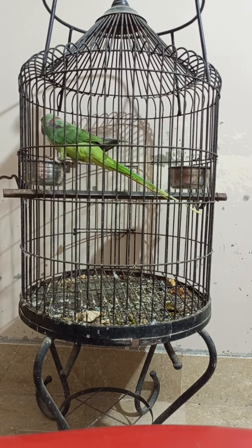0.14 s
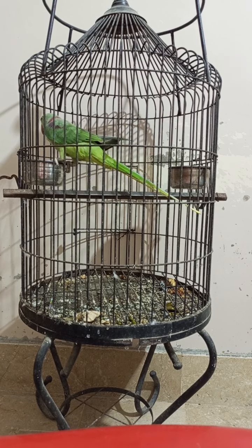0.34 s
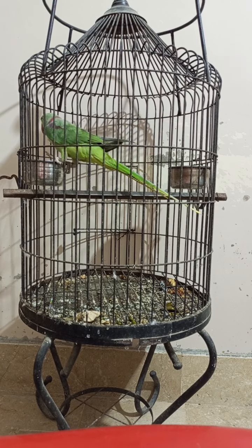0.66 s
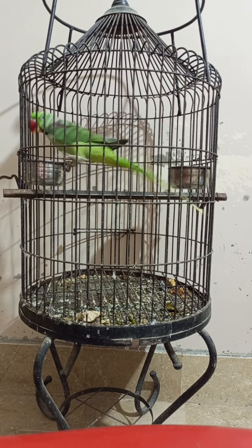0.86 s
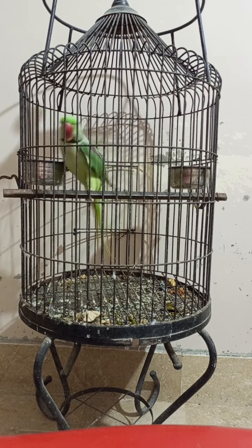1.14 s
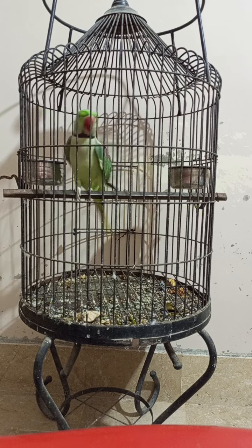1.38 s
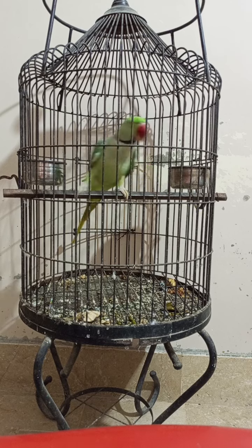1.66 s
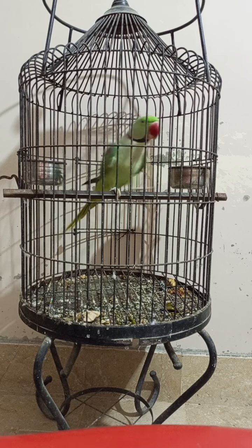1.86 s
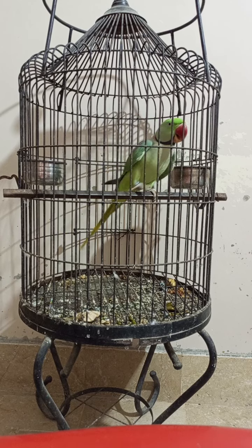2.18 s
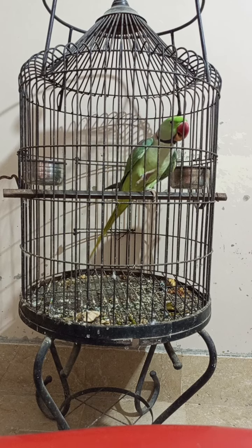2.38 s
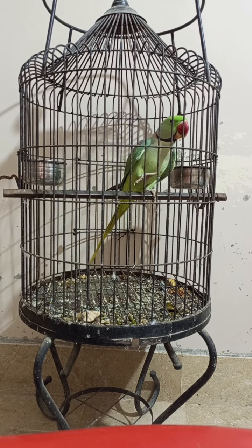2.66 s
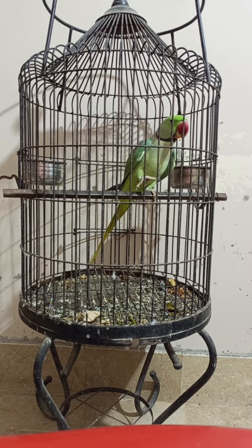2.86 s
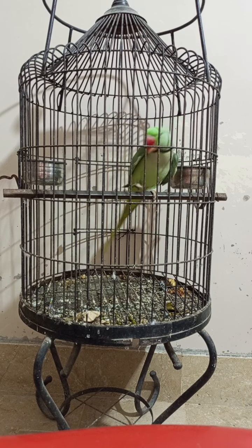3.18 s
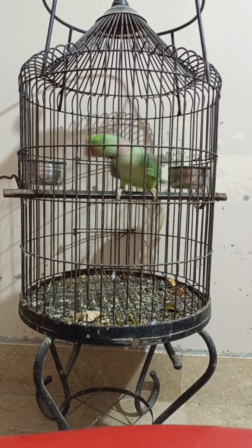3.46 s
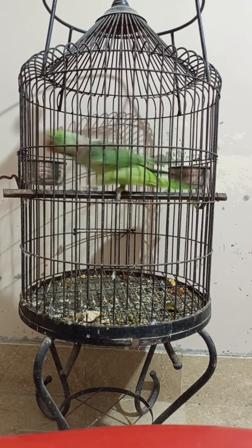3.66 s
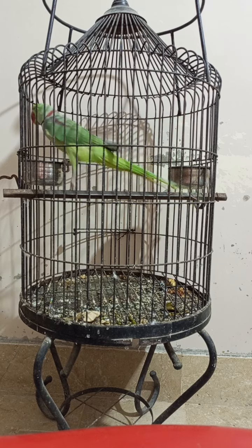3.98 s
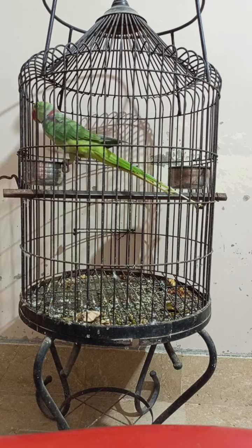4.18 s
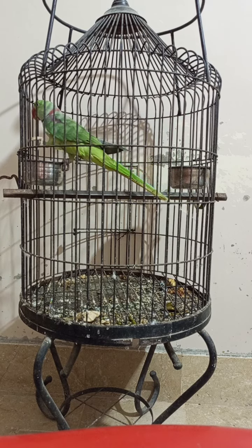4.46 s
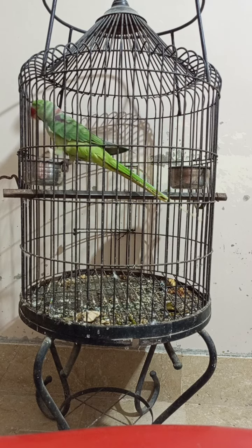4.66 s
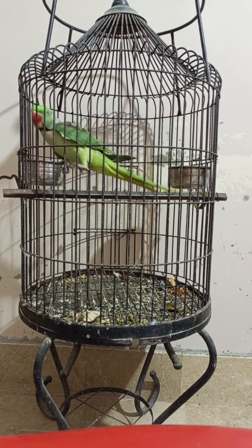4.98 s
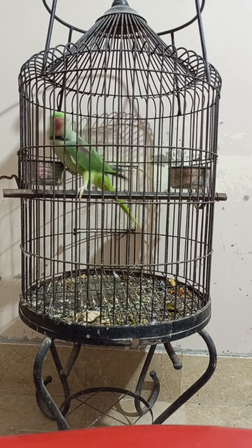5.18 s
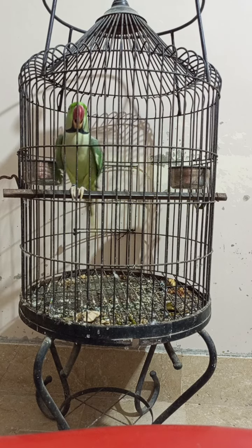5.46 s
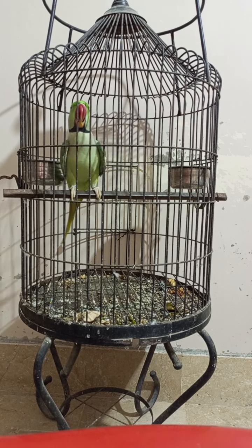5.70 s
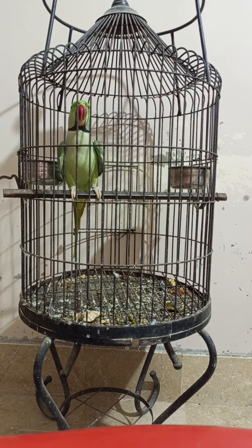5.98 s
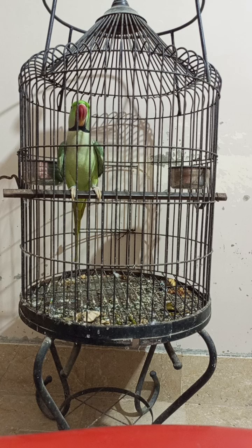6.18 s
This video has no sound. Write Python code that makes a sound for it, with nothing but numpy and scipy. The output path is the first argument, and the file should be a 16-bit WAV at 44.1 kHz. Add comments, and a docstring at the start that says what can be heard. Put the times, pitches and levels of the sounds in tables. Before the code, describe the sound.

Three shrill, rasping parakeet screeches, a second or two apart, echo briefly indoors above soft hiss and faint distant chirps.

```python
"""A bare, hard-walled room; a small microphone near a large parakeet in a wire cage.
The ring of an earlier screech dies into hiss and low hum; faint far chirps and a few soft knocks lie behind.
The parakeet mutters once, then its voice catches and it screeches: a harmonic whistle whose pitch swings
about fifty times a second and grows rough. A far bird answers faintly, claws scrape on the perch,
and two more screeches follow, the room ringing after each."""
import sys
import numpy as np
from scipy import signal
from scipy.fft import rfft, irfft
from scipy.io import wavfile
from scipy.ndimage import uniform_filter1d

SR = 44100
rng = np.random.default_rng(int(sys.argv[2]) if len(sys.argv) > 2 else 0)


def to_wav(sig):
    """Store sig (one row per channel, or 1-D mono) as 16-bit WAV at the path in sys.argv[1].

    Samples outside -1..1 are clipped; the rate is SR.
    """
    pcm = np.clip(np.atleast_2d(sig), -1, 1) * 32767
    pcm = np.round(pcm).astype(np.int16)
    wavfile.write(sys.argv[1], SR, pcm.T)  # frames by channels


N = 279153
TIME = np.arange(N) / SR


def from_db(db):
    """Decibels to gain."""
    return 10 ** (np.asarray(db) / 20)


def rms_one(x):
    """Scale to unit rms."""
    return x / np.sqrt(np.mean(x ** 2) + 1e-20)


def at_hz(points, hz):
    """Read a table on a log-frequency axis."""
    points_hz, values = np.transpose(points)
    return np.interp(np.log(np.maximum(hz, 1)), np.log(points_hz), values)


def gate(start, end, edge_s):
    """One between two times, with short ramps."""
    return np.clip((TIME - start) / edge_s, 0, 1) * np.clip((end - TIME) / edge_s, 0, 1)


def swell(peak_s, rise_s, fall_s, depth_db):
    """Gain that climbs by depth_db to one at its peak, sinks as far again, and stops."""
    away = np.maximum((peak_s - TIME) / rise_s, (TIME - peak_s) / fall_s)
    return from_db(-depth_db * away) * gate(peak_s - rise_s, peak_s + fall_s, edge_s=.005)


def drift(rate_hz):
    """Random wander up to about this rate, at unit rms."""
    lowpass = signal.butter(2, rate_hz, fs=SR, output="sos")
    return rms_one(signal.sosfilt(lowpass, rng.standard_normal(N)))


def colour(x, spectrum, size=8192):
    """Causal (minimum-phase) filter with the given spectral shape and unit power gain."""
    gain = from_db(at_hz(spectrum, np.fft.rfftfreq(size, 1 / SR)))
    cepstrum = irfft(np.log(gain))
    cepstrum[1:size // 2] *= 2
    cepstrum[size // 2 + 1:] = 0
    response = irfft(np.exp(rfft(cepstrum)))
    return signal.fftconvolve(x, response / np.linalg.norm(response))[:N]


def resonance(x, hz, width_hz, gain_db):
    """Lift or cut one band."""
    return x + (from_db(gain_db) - 1) * signal.lfilter(*signal.iirpeak(hz, hz / width_hz, fs=SR), x)


def shelf(x, hz, gain, order=3):
    """Scale everything above a frequency."""
    return x + (gain - 1) * signal.sosfiltfilt(signal.butter(order, hz, "high", fs=SR, output="sos"), x)


def pulses(pitch, count):
    """One pulse a cycle: equal harmonics, as strong per Hz as unit white noise; silent at zero pitch."""
    out, on = np.zeros(N), pitch > 0
    hz = pitch[on]
    phase = 2 * np.pi * np.cumsum(hz) / SR
    harmonics = sum(np.cos(k * phase) * np.clip(SR / 2 / hz - k - 1, 0, 1) for k in range(1, count + 1))
    out[on] = 2 * np.sqrt(hz / SR) * harmonics
    return out


def dying_ring(start_db=-45, fade_db_per_s=116):
    """The walls still ring from an earlier screech."""
    # spectrum of the ring: (frequency [Hz], relative level [dB])
    ring_spectrum = [(470, -63.5), (800, -37.5), (903, -33), (1580, -14.5), (1910, -4.5), (2440, -1.5),
                     (4760, -17.5), (5650, -21.5), (9000, -47.5), (11700, -81), (19800, -120)]
    return from_db(start_db - fade_db_per_s * TIME) * colour(rng.standard_normal(N), ring_spectrum)


def room_tone(hiss_db=-55, hum_db=-67.5, hum_hz=98.3):
    """Steady hiss and a wavering mains hum."""
    # spectrum of the hiss: (frequency [Hz], relative level [dB])
    hiss_spectrum = [(15, -58.5), (25, -23.5), (43, -5.5), (70, -17.5), (94, -5.5), (189, -0.5), (291, 1.5),
                     (557, -11.5), (710, -9), (812, -9.5), (1730, -22), (3490, -28), (5370, -36),
                     (8270, -46), (15800, -49.5)]
    hiss = colour(rng.standard_normal(N), hiss_spectrum)
    hum = np.sqrt(2) * np.sin(2 * np.pi * hum_hz * TIME) * (1 + .3 * drift(4))
    return from_db(hiss_db) * hiss + from_db(hum_db) * hum


def twitters(count=40, per_s=3.6, half_length_s=.21, centre_hz=3620, octaves=.26):
    """Far birds twitter at loose intervals, each at its own pitch and level; one row a chirp."""
    when, high, loud = rng.random((count, 3)).T
    middle_s = (np.arange(count) + when) / per_s
    pitch_hz = centre_hz * 2 ** (octaves * (2 * high - 1))
    level_db = -78 + 4 * loud
    return [(s, half_length_s, hz, db) for s, hz, db in zip(middle_s, pitch_hz, level_db)]


def chirps_and_knocks(waver=.018, flicker=.7):
    """Faint far chirps and squeaks, and a few soft, low, pitched knocks: tones that swell and fade."""
    # the clearer chirps, squeaks and knocks: (middle [s], half-length [s], pitch [Hz], level [dB])
    tones = [(.38, 0.46, 2970, -69), (1.275, 0.044, 643.5, -42.5), (1.75, .2, 3900, -75),
             (2.742, .1, 2757, -63), (2.82, 0.068, 2730, -67), (2.976, .05, 2300, -60.5),
             (3.21, .07, 720, -56.5), (3.3, .073, 3545, -68), (3.64, .36, 3052, -69),
             (4.74, .11, 4500, -69), (4.92, .22, 3413, -70), (6.055, .062, 350.6, -49.5),
             (6.11, 0.054, 716, -56)]
    out = np.zeros(N)
    wavering_time = np.cumsum(1 + waver * drift(120)) / SR
    for middle_s, half_s, hz, db in list(tones) + twitters():
        near = np.abs(TIME - middle_s) < half_s
        envelope = np.cos(np.pi / 2 * (TIME[near] - middle_s) / half_s) ** 4
        out[near] += from_db(db) * envelope * np.sin(2 * np.pi * hz * wavering_time[near])
    return out * rms_one(1 + flicker * drift(39))


def mutter(hoarse=.54, jitter=.025, flutter=.3, flip_s=.006):
    """Two low, hoarse notes that swell and fade, each flipping its pitch halfway."""
    # notes: (peak [s], swell [s], fade [s], first pitch [Hz], second pitch [Hz], level [dB], treble [dB])
    low_notes = [(1.061, .057, .075, 432, 257.8, -31.5, 4.5),
                 (1.175, .11, .028, 265.2, 325.6, -33.5, -13.5)]
    # resonances of the mouth: (frequency [Hz], relative gain [dB])
    mouth = [(400, -39), (530, -4.5), (850, 4.5), (1050, -7.5), (1300, 1.5), (1480, -2), (1650, -3.5),
             (2150, -10), (2550, -38.5), (5000, -34), (7500, -33), (9800, -39.5), (11000, -59)]
    notes = 0
    for peak_s, swell_s, fade_s, first_hz, second_hz, db, treble_db in low_notes:
        loudness = swell(peak_s, swell_s, fade_s, depth_db=21)
        halfway_s = peak_s + (fade_s - swell_s) / 2
        flipped = .5 + .5 * np.tanh((TIME - halfway_s) / flip_s)
        pitch = (first_hz + flipped * (second_hz - first_hz)) * (1 + jitter * drift(200))
        voice = pulses(pitch * (loudness > 0), count=40) + hoarse * rng.standard_normal(N)
        voice = shelf(voice, hz=5500, gain=from_db(treble_db))
        voice = shelf(voice, hz=1550, gain=loudness ** .4)   # the overtones swell faster than the note
        notes = notes + from_db(db) * loudness * voice
    return colour(notes * (1 + flutter * drift(100)), mouth)


def rasp(level_db=-39):
    """A short noisy rasp between the two notes of the mutter."""
    # spectrum of the rasp: (frequency [Hz], relative level [dB])
    rasp_spectrum = [(1000, -12.5), (1900, 3), (2600, -2.5), (3200, 5.5), (4500, -10.5), (6300, -13.5),
                     (8000, -32.5), (12000, -45.5), (15000, -31)]
    envelope = swell(peak_s=1.128, rise_s=.012, fall_s=.05, depth_db=16)
    return colour(from_db(level_db) * envelope * rng.standard_normal(N), rasp_spectrum)


def creaks():
    """The voice catches as a screech begins: single noisy puffs through the half-open syrinx."""
    # puffs of air: (start [s], length [s], level [dB])
    puffs = [(1.967, 0.0093, -38), (1.982, 0.0062, -24), (2.003, .009, -38), (3.871, 0.013, -37.5),
             (3.893, .1, -43), (5.168, 0.011, -30.5)]
    # spectrum of a puff: (frequency [Hz], relative level [dB])
    puff_spectrum = [(400, -39.5), (800, 8.5), (1200, -10.5), (1800, 4), (2500, -5), (3200, -1),
                     (4500, -18.5), (6800, -16), (8500, -42), (15000, -47)]
    envelope = sum(from_db(db) * gate(s, s + length, edge_s=.0056) for s, length, db in puffs)
    return colour(envelope * rng.standard_normal(N), puff_spectrum)


def trill_course(t, length, strained_s, sinking_s, lowest_hz, break_s=.028, rebound_s=.075, release_s=.1):
    """The bird pushes ever harder until the strain breaks; the trill sinks, recovers a little, fades."""
    strained_bottom_hz, break_bottom_hz, relaxed_bottom_hz = 1440, 1320, 1090
    strained_top_hz, relaxed_top_hz = 2841, 1945
    onset_db, peak_db, tired_db, end_db = -4, 1.4, -1.5, -14   # effort against the level of the call
    pushed = np.clip(t / strained_s, 0, 1)
    strained = np.interp(t, [strained_s, strained_s + break_s], [1, 0])
    sunk = np.clip((t - strained_s) / sinking_s, 0, 1) ** 1.5   # gives way slowly, then faster
    recovered = np.clip((t - strained_s - sinking_s) / rebound_s, 0, 1)
    push_db = strained * (onset_db + (peak_db - onset_db) * pushed ** 2)
    fade_db = np.interp(t, [strained_s, length - release_s, length], [0, tired_db, end_db])
    bottom_hz = (break_bottom_hz + strained * (strained_bottom_hz - break_bottom_hz)
                 + sunk * (lowest_hz - break_bottom_hz) + recovered * (relaxed_bottom_hz - lowest_hz))
    follow = (bottom_hz / relaxed_bottom_hz) ** .2   # the top makes a fifth of the bottom's fall
    top_hz = strained * strained_top_hz + (1 - strained) * relaxed_top_hz * follow
    bend = 2 ** (-.01 * fade_db)   # the pitch lifts slightly as the effort fades
    return bend * bottom_hz, bend * top_hz, push_db + fade_db


def call_colour(voice, peaks_and_dips, t, effort_db, opening_s=.11):
    """Ringing peaks and dips from the throat and nearby walls colour a call; its top fades with effort."""
    strength = np.std(voice)
    for hz, width_hz, db in peaks_and_dips:
        voice = resonance(voice, hz, width_hz, db)
    shut = np.exp(-(t / opening_s) ** 4)   # the half-shut beak is hollow at first
    hollow = resonance(voice, hz=2330, width_hz=800, gain_db=-20)
    voice = voice + shut * (hollow - voice)
    top_db = 2.2 + 1.1 * np.minimum(effort_db, 0)
    return strength * rms_one(shelf(voice, hz=11000, gain=from_db(top_db), order=4))


def screech(call, swings_per_s, peaks_and_dips, first_trough_s=.0025, throb_db=11, uneven_db=1.2):
    """Both sides of the syrinx whistle in a fast trill; with roughness they shake and fall out of step."""
    # response of throat and beak: (frequency [Hz], relative gain [dB])
    throat = [(500, -40), (850, -8), (1400, -4), (1900, -5), (2200, 0.5), (2950, -0.5), (3700, -6),
              (4900, -11.5), (6300, -9), (7400, -17), (8200, -29.5), (12500, -42.5), (15200, -33)]
    jitter, flutter, air, wobble, second_side = .04, .6, .12, .06, .85   # at full roughness
    start, length, strained_s, sinking_s, lowest_hz, call_db, first_rough, last_rough = call
    t = TIME - start
    bottom_hz, top_hz, effort_db = trill_course(t, length, strained_s, sinking_s, lowest_hz)
    rough = np.interp(t, [0, length], [first_rough, last_rough])
    sounding = gate(start, start + length, edge_s=.0012)
    turns = (t - first_trough_s) * swings_per_s + wobble * rough * drift(30)
    # membranes pulled very tight choke the air, so the wide opening swings come as separate throbs
    strain = np.clip(np.log2(top_hz / 1900) * 2, .18, 1)
    voice = air * rough * rng.standard_normal(N)
    for share, lag in [(1, 0), (second_side * rough, .36 + .091 * drift(15))]:
        swing = np.abs(np.sin(np.pi * (turns - lag))) ** 1.9
        trough_hz = bottom_hz * (1 + .032 * drift(24.12))
        pitch = (trough_hz + (top_hz - trough_hz) * swing) * (1 + jitter * rough * drift(780))
        choke = np.sin(np.pi * (turns - lag - .08)) ** 2   # tightest just after each crest
        opening = from_db(-throb_db * strain * choke)
        shake = 1 + flutter * rough * drift(640)
        voice = voice + share * opening * shake * pulses(pitch * (sounding > 0), count=18)
    loudness = sounding * from_db(call_db + effort_db + uneven_db * drift(45))
    voice = colour(voice * loudness, throat)
    return call_colour(voice, peaks_and_dips, t, effort_db * (t > strained_s))


def screeches():
    """Three screeches near the microphone; a far bird answers the first."""
    # calls, the far bird last: (start [s], length [s], strained opening [s], sinking [s],
    # lowest pitch before the bend [Hz], level [dB], first roughness [0-1], last roughness [0-1])
    calls = [(2.023, .291, .028, .115, 940, -19.5, .1, .22), (3.890, 0.38, .11, .225, 900, -20.3, .17, .66),
             (5.190, 0.36, .095, .07, 840, -19, .07, .25), (2.66, .3, 0.11, .16, 2200, -62, .9, 0.9)]
    # trill of each call: (rate [swings/s])
    trill_rates = [49.4, 49.2, 45.9, 48]
    # each call's peaks and dips, from the throat and nearby walls: (frequency [Hz], width [Hz], gain [dB])
    peaks_and_dips = [
        [(1900, 84, 10), (2370, 68, 8.5), (3050, 360, 11.5), (5000, 700, -2), (7150, 410, 8),
         (14180, 5000, -3.5)],
        [(1400, 160, -0.5), (1961, 120, 9.5), (2770, 760, 5.5), (3980, 400, 7), (14000, 3700, -1)],
        [(1934, 110, 10.5), (2660, 270, 7), (3100, 480, 3.5), (4400, 410, 7.5), (5500, 280, 1),
         (14000, 2100, 4)],
        [(2380, 120, 12.5), (2740, 97, 9), (3650, 150, 11), (4380, 110, 11), (6850, 630, 3)],
    ]
    return sum(screech(*settings) for settings in zip(calls, trill_rates, peaks_and_dips))


def claw_scrape(level_db=-67.5, band_hz=(5500, 10500)):
    """Claws slip on the perch as the bird turns: a brief, thin scrape."""
    bandpass = signal.butter(3, band_hz, "band", fs=SR, output="sos")
    scrape = rms_one(signal.sosfilt(bandpass, rng.standard_normal(N)))
    return from_db(level_db) * swell(peak_s=3.79, rise_s=.02, fall_s=.11, depth_db=18) * scrape


def room(x, echo_db=-9, first_echo_s=.0025, build_s=.0098, band_count=12):
    """Bare walls: dense echoes that build up quickly and die sooner in the treble."""
    # reverberation of the room: (frequency [Hz], time to fall 60 dB [s])
    decay_times = [(300, 0.28), (1000, 0.7), (2500, 0.62), (4000, 0.61), (7000, 0.51), (11000, 0.14),
                   (16000, 0.048)]
    t = TIME[:int(1.2 * SR)]
    hz, centres = np.fft.rfftfreq(len(t), 1 / SR), np.geomspace(200, 15800, band_count)
    white, tail = rfft(rng.standard_normal(len(t))), 0
    for centre, pick in zip(centres, np.eye(band_count)):
        band = irfft(white * at_hz(np.c_[centres, pick], hz), len(t))
        tail = tail + band * from_db(-60 * t / at_hz(decay_times, centre))
    build_up = np.clip((t - first_echo_s) / build_s, 0, 1)
    tail = build_up * resonance(tail, hz=2460, width_hz=370, gain_db=4)
    return x + from_db(echo_db) * signal.fftconvolve(x, tail / np.linalg.norm(tail))[:N]


def suppress(x, depth_db=7.5, threshold_db=12.5, size=1024):
    """Noise suppressor: bands near their own quiet level are turned down, cutting the room's tail short."""
    bands = signal.stft(x, nperseg=size)[2]
    power = uniform_filter1d(np.abs(bands) ** 2, size=3, axis=-1)
    power = uniform_filter1d(power, size=3, axis=-2)
    quiet = np.quantile(power, .25, axis=-1, keepdims=True)
    threshold = quiet * from_db(threshold_db) ** 2 + 1e-20
    closed = 1 / (1 + (power / threshold) ** 2)
    return signal.istft(bands * from_db(-depth_db * closed), nperseg=size)[1][..., :N]


def limit(x, ceiling_db=-22, release_db_per_s=46.5, size=256):
    """Gain control holds the loudest moments level and recovers while the room rings."""
    level_db = 10 * np.log10(np.abs(uniform_filter1d(x ** 2, size=size)) + 1e-12)
    excess_db = np.maximum(level_db - ceiling_db, 0)
    release_db = release_db_per_s * TIME
    cut_db = np.maximum.accumulate(excess_db + release_db, axis=-1) - release_db
    return x * from_db(-uniform_filter1d(cut_db, size=size))


def scene():
    """Birds, knocks and claws reach one microphone through the room, over the room tone."""
    direct = screeches() + creaks() + mutter() + rasp() + chirps_and_knocks() + claw_scrape()
    return (room(direct) + room_tone() + dying_ring())[None]


def record(dry, low_cut_hz=44, high_cut_hz=15800):
    """A small microphone without deep bass, a noise suppressor, gain control and a steep cut of the top."""
    low_cut = signal.butter(4, low_cut_hz, "high", fs=SR, output="sos")
    high_cut = signal.ellip(10, .1, 70, high_cut_hz, fs=SR, output="sos")
    heard = suppress(signal.sosfilt(low_cut, dry))
    return signal.sosfilt(high_cut, limit(heard))


dry = scene()
out = record(dry)
to_wav(out)
```